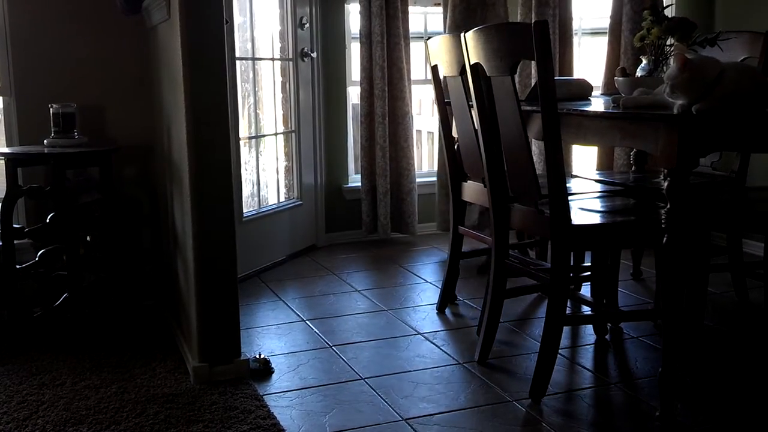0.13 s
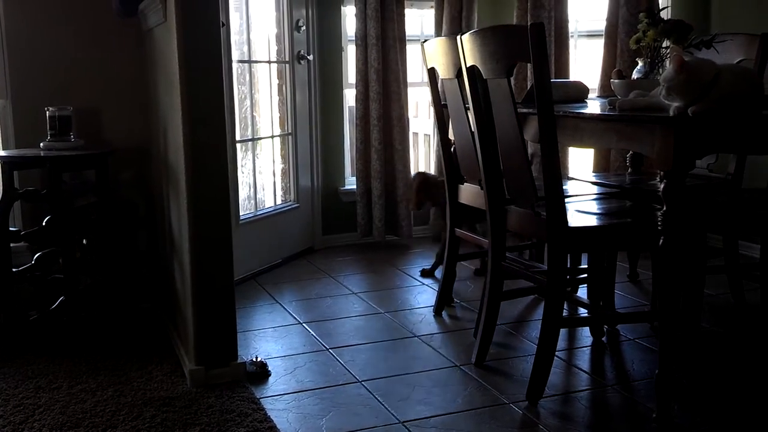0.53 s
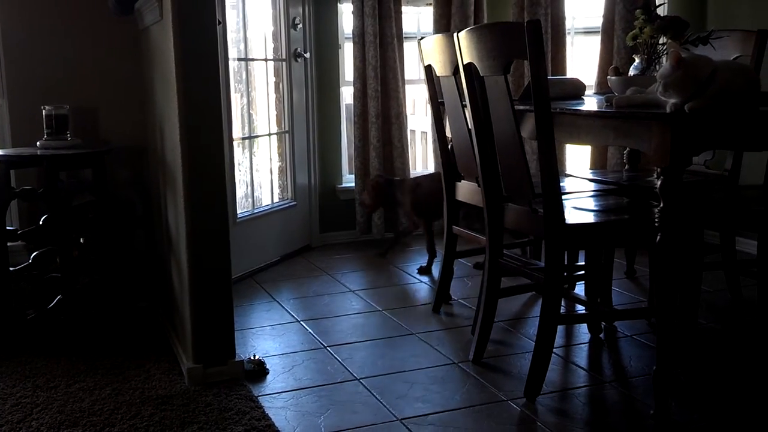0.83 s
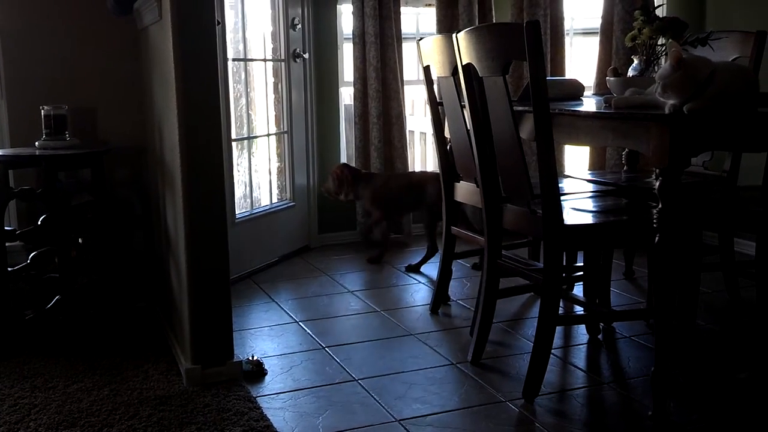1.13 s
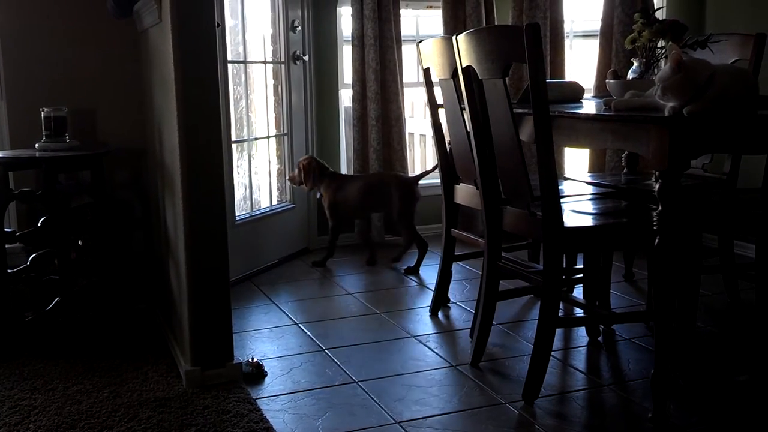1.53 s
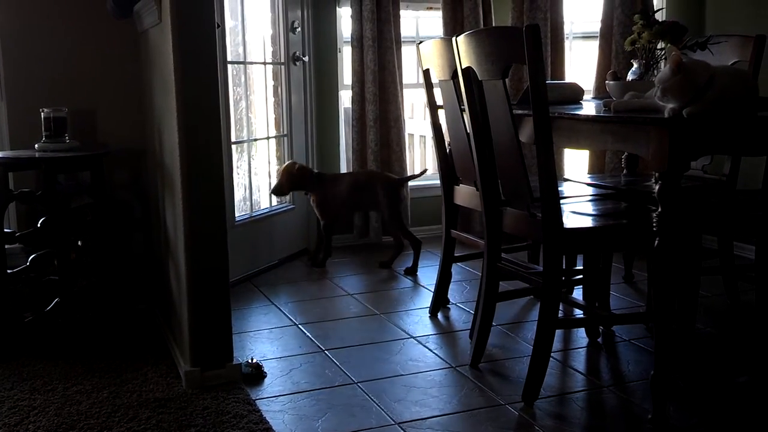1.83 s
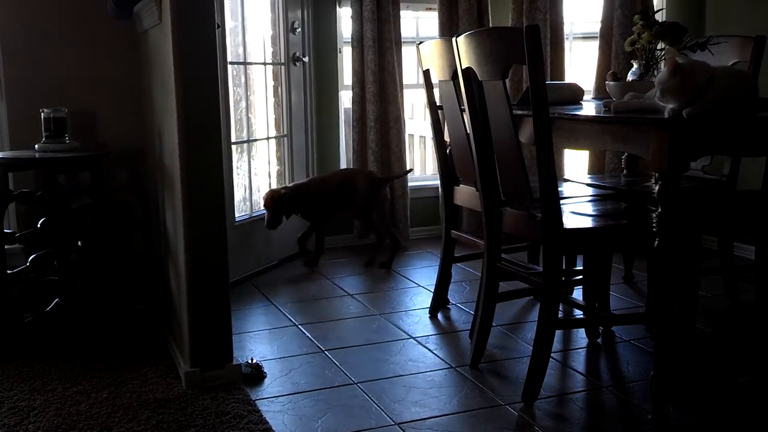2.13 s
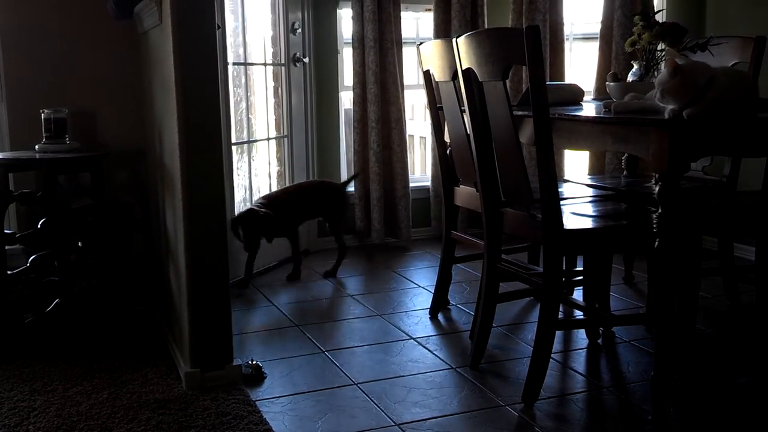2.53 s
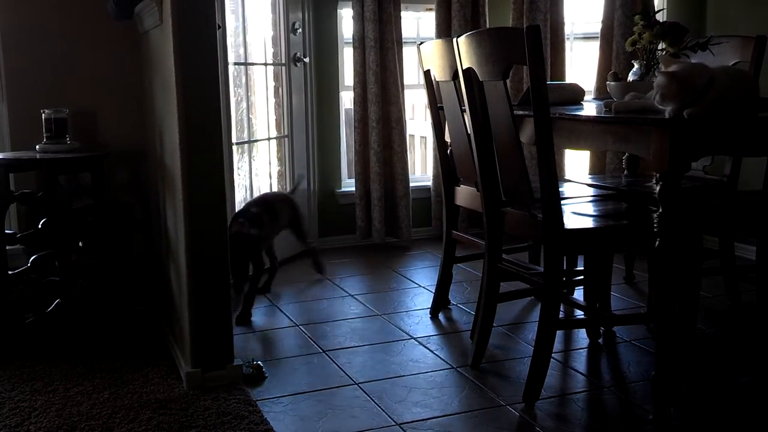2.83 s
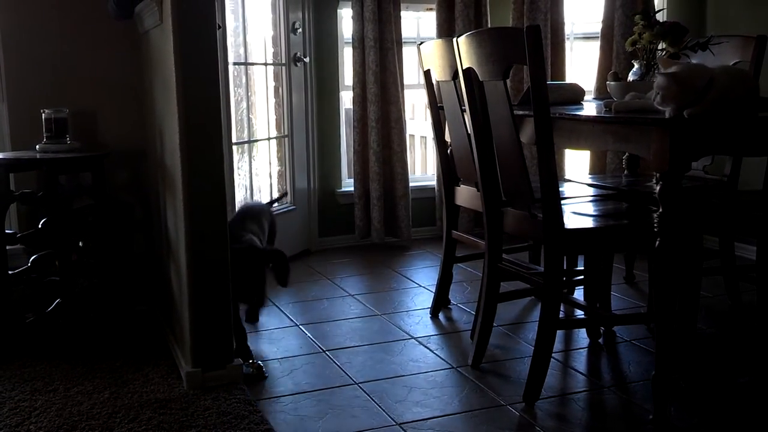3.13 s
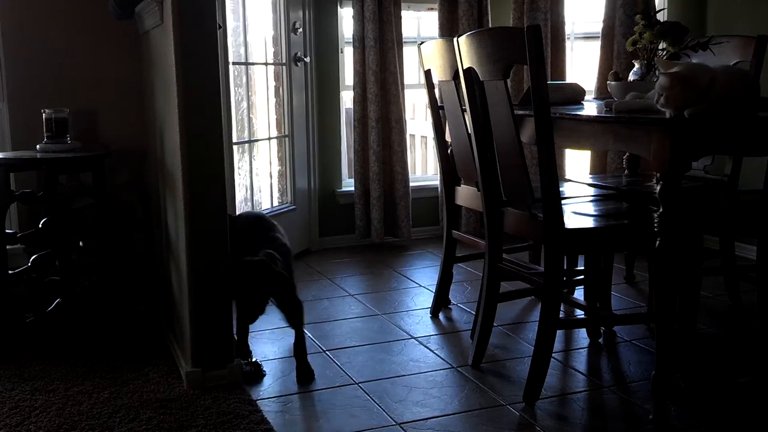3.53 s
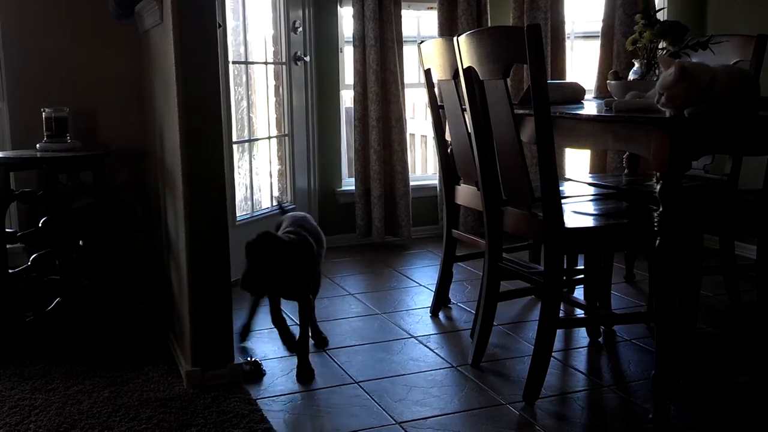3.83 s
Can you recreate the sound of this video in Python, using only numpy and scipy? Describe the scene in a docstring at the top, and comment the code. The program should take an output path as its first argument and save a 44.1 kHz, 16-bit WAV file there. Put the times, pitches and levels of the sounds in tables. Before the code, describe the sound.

Small bell rattles and rings in quick bright strikes after soft paw bumps on hard floor.

```python
"""Dog and small bell on a tiled floor

A dog walks over tiles and nudges a small hanging bell. Paws bump and scuff: noise bursts through
floor resonances, and soft bright swells. The bell is a bank of struck, ringing modes; a long scrape
is dense grains through flickering resonances. A motor whines faintly in high multiples of its tooth
rate, over a hum and room noise. The right channel carries most sources inverted and a little late.
"""
import sys
import numpy as np
from scipy import signal
from scipy.fft import rfft, irfft
from scipy.io import wavfile

SR = 44100
rng = np.random.default_rng(int(sys.argv[2]) if len(sys.argv) > 2 else 0)


def linear_from_db(decibels):
    """Turn decibels (scalar or array-like) into linear amplitude factors; 0 gives 1."""
    return 10 ** (np.asarray(decibels, float) / 20)


def unload_audio(sound):
    """Save the sound as a 16-bit wav file, at the path given as the first command line argument."""
    columns = np.transpose(np.atleast_2d(sound))
    # keep every value between -1 and 1, then stretch to whole-number steps
    steps = np.round(np.clip(columns, -1, 1) * 32767)
    wavfile.write(sys.argv[1], SR, steps.astype(np.int16))


N = 176400

# In noise spectra the level is relative and per Hz: the noise is then scaled to rms 1.
# Motor level: (time [s], level [dB])
MOTOR_LEVEL = [(0, -49), (.4, -52), (1.0, -53), (1.35, -55.5), (1.8, -54.5), (2.2, -51.5), (2.6, -52.5),
               (3.0, -54), (3.3, -60), (4, -61.5)]
# Motor speed: (time [s], tooth rate [Hz])
TOOTH_RATE = [(0, 203.8), (.5, 203.6), (1.25, 203.6), (1.75, 203.85), (2.25, 204.25), (2.75, 204.65),
              (3.1, 204.4), (4, 204.6)]
# Relative level of each successive multiple of the tooth rate: level [dB]
MULTIPLE_LEVELS = [-8.5, -15.5, -8.5, -21, -9, -11.5, -41, -1, -0.5, 0.5, -5.5, -8.5, -2, -4, -21, -4, -1.5,
                   -3.5, -3, -2.5, -8, -2.5, -12, -10, -16.5, -16.5]
FIRST_MULTIPLE = 20
# A slower shaft puts a side line on either side of each multiple.
SHAFT_HZ, SIDE_LINE_DB = 56.93, -12
WHINE_WANDER_DB, WHINE_WANDER_HZ = 2.2, 1.5
# Motor hiss spectrum: (frequency [Hz], level [dB])
HISS_SPECTRUM = [(3500, -14), (4500, -1), (5700, 1), (7800, 3.5), (8600, -16), (9400, -46)]
# Motor hiss level: (time [s], level [dB])
HISS_COURSE = [(0, -60.5), (1.2, -62), (1.4, -63.5), (1.9, -64), (2.2, -64.5), (3.0, -56.5), (3.6, -58),
               (4, -62.5)]
# Hum lines: (frequency [Hz], level [dB], lead of the left channel [rad])
HUM_LINES = [(119.7, -68.5, 1.3), (215.8, -60.5, 1.46), (324.2, -69.5, 1.31)]
# Room noise spectrum: (frequency [Hz], level [dB])
AIR_SPECTRUM = [(25, -36), (60, -10), (120, -1), (250, -1), (600, -11.5), (1000, -11), (2000, -17.5),
                (3500, -21), (9000, -28.5), (16000, -23)]
# Room noise level: (time [s], level [dB])
AIR_COURSE = [(0, -55), (.8, -52.5), (1.2, -55), (1.4, -56.5), (2, -59), (3, -55.5), (4, -54)]
# Spectrum of the low noise that differs between the channels: (frequency [Hz], level [dB])
WIDE_SPECTRUM = [(25, -30), (60, -14.5), (95, 1.5), (130, 0), (250, -0.5), (600, -7.5), (900, -12),
                 (1300, -46), (2000, -55)]
WIDE_NOISE_DB, WIDE_CORRELATION = -59, 0.37
# Soft scuffs: (time [s], level [dB], length [s])
SCUFF_EVENTS = [(.135, -59, 0.047), (.55, -57, 0.034), (0.689, -55.5, 0.048), (0.742, -57.5, 0.1),
                (1.098, -53.5, 0.066), (2.02, -63, 0.043), (2.289, -59, 0.048), (2.427, -68, 0.031),
                (3.83, -70, 0.026)]
# Scuff spectrum: (frequency [Hz], level [dB])
SCUFF_SPECTRUM = [(1500, -8), (3500, 15.5), (6000, 11), (10000, 7), (16000, 5.5)]
# Paw bumps: (time [s], peak level [dB], pitch [Hz], fall by 60 dB [s])
PAW_BUMPS = [(0.288, -43.5, 800, 0.25), (0.476, -42.5, 270, 0.044), (0.631, -45.5, 800, 0.11),
             (0.74, -29.5, 1010, 0.038), (0.758, -33.5, 1036, 0.053), (0.781, -40.5, 844, 0.26),
             (1.017, -46, 1250, 0.19), (1.049, -45, 1240, 0.27), (3.019, -52, 1180, .1)]
# Floor resonances: (multiple of the bump's pitch [ratio], level [dB])
FLOOR_MODES = [(.37, 1.5), (1.0001, 4.5), (.8, -8.5), (1.45, -7.5), (1.9, -14.5), (2.3, -12), (2.8, -15)]
# Bell modes in six groups that a strike excites unevenly: (frequency [Hz], level [dB], fall by 60 dB [s])
BELL_GROUPS = [
    [(4140, -12, 0.3), (4160, 0, 0.3)],
    [(4500, -7, .14), (4569, 0, 0.15), (4595, -5, .22), (4637, -8, 0.22)],
    [(9030, 0, 0.15), (9065, -3, 0.15), (9180, -8, 0.13), (9290, -12, .11)],
    [(11919, 0, .21), (11951, -1, .2)],
    [(12440, -12, .18), (12545, -3, 0.2), (12595, 0, 0.27), (12680, -8, .16)],
    [(14290, -9, .15), (14330, 0, .16), (14348, -1.5, .16), (14405, -12, .16)],
]
# Bell strikes: (time [s], level of each of the six groups [dB], crack level [dB])
BELL_STRIKES = [(2.651, -59, -42.5, -49, -60, -45, -46, -43),
                (2.657, -59, -44, -45.5, -60, -43.5, -49, -54), (2.837, -63, -49, -58, -51, -53, -64, -54),
                (2.849, -54.5, -55, -64, -61, -59, -68, -66),
                (3.0886, -54, -54, -39.5, -34, -36, -38, -29.5), (3.098, -43, -50, -47, -47, -39, -44, -56),
                (3.113, -50.5, -54, -39, -36, -37, -38, -54), (3.141, -44.5, -56, -59, -44, -44, -44, -62),
                (3.17, -60, -52, -58, -54, -52, -49, -66), (3.927, -52, -51.5, -40.5, -45, -40, -28, -33)]
# Stereo place of each bell group: left minus right [dB]
GROUP_PAN = [0, 0, -1.2, -.3, -.3, 3]
CONTACT_T60_S = 0.0054  # the touch is soft: each mode swells for about a millisecond
CRACK_T60_S, CRACK_HIGH_PASS_HZ = 0.014, 4000
RATTLES_PER_S, RATTLE_DB, RATTLE_T60_S = 120, -16, 0.33
# The long scrape: (time [s], level [dB])
SCRAPE_LEVEL = [(3.304, -79), (3.309, -45.5), (3.34, -42.5), (3.365, -43), (3.385, -31), (3.42, -34.5),
                (3.47, -40.5), (3.55, -50), (3.66, -60)]
# Spectrum of the bare scrape: (frequency [Hz], level [dB])
SCRAPE_SPECTRUM = [(300, -22), (700, -15), (1500, 13), (3000, 3), (5000, 2), (8000, 1), (11000, -1),
                   (16000, -20)]
# Scrape resonances: (frequency [Hz], width [Hz], level [dB])
SCRAPE_MODES = [(800, 32, -16.5), (1269, 100, -3.5), (1610, 250, -8.5), (4210, 170, -11), (4460, 150, -6),
                (6490, 100, -4.5), (9200, 450, -5.5), (12400, 200, -9.5), (13900, 180, -15),
                (15050, 140, -2)]
SCRAPE_GRAINS_PER_S, SCRAPE_FLICKER_DB = 4000, 2.5
# The scrape's treble dies first.
DULL_FROM_S, DULL_DB_PER_S, DULL_ABOVE_HZ = 3.43, 60, 5200
# A low thud: (time [s], peak level [dB], resonance [Hz], fall by 60 dB [s])
LOW_THUD = (3.86, -52.5, 91, 0.8)
# A dull noise swell, cut off by the end:
# (time [s], peak level [dB], upper band edge [Hz], fall by 60 dB, negative for a rise [s])
LAST_SWELL = (3.9465, -38.5, 1900, -0.2)
ROOM_T60_S, ROOM_DB, ROOM_GAP_S = 0.21, -6, 0.0033
OWN_TAIL_DB = -17.5  # further tail that each channel has alone, on top of ROOM_DB
RIGHT_LAG_SAMPLES = 16


def rms_one(x):
    """Scale to rms 1."""
    return x / np.sqrt(np.mean(x ** 2) + 1e-20)


def in_time(rows):
    """Columns of a breakpoint curve, one value a sample."""
    s, *columns = np.transpose(rows)
    return [np.interp(np.arange(N) / SR, s, column) for column in columns]


def coloured(x, spectrum):
    """Give a noise its spectrum, interpolated over log frequency; rms 1."""
    hz, db = np.transpose(spectrum)
    f = np.maximum(np.arange(N // 2 + 1) * SR / N, 1)
    gain = linear_from_db(np.interp(np.log(f), np.log(hz), db))
    return rms_one(irfft(rfft(x) * gain, N))


def drift(rate_hz):
    """Slow random wander of rms 1: noise through two equal low-pass poles."""
    # made at a hundredth of the sample rate, the settling thrown away
    r = np.exp(-200 * np.pi * rate_hz / SR)
    slow = signal.lfilter([1], [1, -2 * r, r * r], rng.standard_normal(N // 100 + 1002))[1000:]
    return np.interp(np.arange(N) / 100, np.arange(len(slow)), rms_one(slow))


def ring(clicks, hz, t60):
    """Two-pole resonator: a unit click sets a dying sine of height 1 ringing."""
    r, w = linear_from_db(-60 / (t60 * SR)), 2 * np.pi * hz / SR
    return signal.lfilter([0, np.sin(w)], [1, -2 * r * np.cos(w), r * r], clicks + 1e-18)


def dying(s, t60):
    """Envelope that starts at s and falls 60 dB in t60 (rises if t60 is negative)."""
    t = np.arange(N) / SR - s
    return (t >= 0) * linear_from_db(-60 * np.maximum(t, 0) / t60)


def motor():
    """High multiples of the tooth rate, each wandering in level, with side lines and hiss."""
    rate, = in_time(TOOTH_RATE)
    level_db, = in_time(MOTOR_LEVEL)
    hiss_db, = in_time(HISS_COURSE)
    turn = 2 * np.pi * np.cumsum(rate) / SR
    shaft = 2 * np.pi * SHAFT_HZ * np.arange(N) / SR
    whine = 0
    for k, multiple_db in enumerate(MULTIPLE_LEVELS):
        phase = rng.uniform(0, 2 * np.pi, 3)
        line = (FIRST_MULTIPLE + k) * turn
        side_gain = linear_from_db(SIDE_LINE_DB + WHINE_WANDER_DB * drift(WHINE_WANDER_HZ))
        sides = np.sin(line + shaft + phase[1]) + np.sin(line - shaft + phase[2])
        gain = linear_from_db(multiple_db + WHINE_WANDER_DB * drift(WHINE_WANDER_HZ))
        whine = whine + gain * (np.sin(line + phase[0]) + side_gain * sides)
    hiss = coloured(rng.standard_normal(N), HISS_SPECTRUM)
    return linear_from_db(level_db) * rms_one(whine) + linear_from_db(hiss_db) * hiss


def hum():
    """Low sines that waver in level and phase, the left channel leading; two channels."""
    t = np.arange(N) / SR
    out = 0
    for hz, db, lead in HUM_LINES:
        phase = 2 * np.pi * hz * t + 0.44 * drift(2.9) + np.array([[lead], [0]])
        out = out + linear_from_db(db + 1.26 * drift(7.8)) * np.sqrt(2) * np.sin(phase)
    return out


def room_noise():
    """Coloured noise whose level follows a curve and wanders slowly."""
    level_db, = in_time(AIR_COURSE)
    return linear_from_db(level_db + 3.1 * drift(0.98)) * coloured(rng.standard_normal(N), AIR_SPECTRUM)


def wide_noise():
    """Low noise, only partly alike in the two channels: a mid and a side noise are mixed."""
    mid = np.sqrt(1 + WIDE_CORRELATION) * coloured(rng.standard_normal(N), WIDE_SPECTRUM)
    side = np.sqrt(1 - WIDE_CORRELATION) * coloured(rng.standard_normal(N), WIDE_SPECTRUM)
    return linear_from_db(WIDE_NOISE_DB) * (mid + side * [[1], [-1]]) / np.sqrt(2)


def scuffs():
    """Short swells of bright noise that rise faster than they fall."""
    t = np.arange(N) / SR
    swell = 0
    for s, db, length in SCUFF_EVENTS:
        progress = np.clip((t - s) / length, 0, 1)
        swell = swell + linear_from_db(db) * np.sin(np.pi * progress ** 0.58)
    return swell * coloured(rng.standard_normal(N), SCUFF_SPECTRUM)


def bumps():
    """A paw's burst of noise dies away in the floor's resonances."""
    out, white = 0, rng.standard_normal(N)
    for s, db, hz, t60 in PAW_BUMPS:
        burst = white * dying(s, t60)
        bump = sum(linear_from_db(mode_db) * ring(burst, hz * ratio, 15.5 / hz) for ratio, mode_db in FLOOR_MODES)
        out = out + linear_from_db(db) * bump / np.abs(bump).max()
    return out


def bell():
    """Each strike rings the modes and cracks briefly; the loose clapper touches again, ever weaker."""
    out, strikes = 0, np.array(BELL_STRIKES)
    starts = (strikes[:, 0] * SR).astype(int)
    soft = 2 * (1 - linear_from_db(-60 / (CONTACT_T60_S * SR)))
    touch = rng.random(N) < RATTLES_PER_S / SR
    for k, group in enumerate(BELL_GROUPS):
        fading = sum(linear_from_db(row[k + 1]) * dying(row[0], RATTLE_T60_S) for row in BELL_STRIKES)
        rattle = linear_from_db(RATTLE_DB) * touch * fading
        pan = linear_from_db(GROUP_PAN[k] * np.array([[.5], [-.5]]))
        for hz, db, t60 in group:
            clicks = rattle * rng.standard_normal(N)
            clicks[starts] = linear_from_db(strikes[:, k + 1] + rng.normal(0, 1.0, len(strikes)))
            push = soft * ring(clicks, hz, CONTACT_T60_S)
            out = out + pan * linear_from_db(db) * ring(push, hz, t60)
    high_pass = signal.butter(1, CRACK_HIGH_PASS_HZ, "high", fs=SR, output="sos")
    crack = signal.sosfilt(high_pass, rng.standard_normal(N))
    return out + crack * sum(linear_from_db(row[-1]) * dying(row[0], CRACK_T60_S) for row in BELL_STRIKES)


def scrape():
    """Dense grains, partly bare, partly through flickering resonances; the treble dies first."""
    t = np.arange(N) / SR
    grains = rng.standard_normal(N) * (0.5 + (rng.random(N) < SCRAPE_GRAINS_PER_S / SR))
    out = coloured(grains, SCRAPE_SPECTRUM)
    for hz, width_hz, db in SCRAPE_MODES:
        t60 = np.log(1000) / (np.pi * width_hz)
        flicker = linear_from_db(db + SCRAPE_FLICKER_DB * drift(14.0))
        out = out + flicker * rms_one(ring(grains, hz, t60))
    low_pass = signal.butter(2, DULL_ABOVE_HZ, fs=SR, output="sos")
    treble = (out - signal.sosfiltfilt(low_pass, out)) / out.std()
    treble_gain = linear_from_db(-DULL_DB_PER_S * np.maximum(t - DULL_FROM_S, 0))
    out = rms_one(out) + (treble_gain - 1) * treble
    level_db, = in_time(SCRAPE_LEVEL)
    sounding = (t > SCRAPE_LEVEL[0][0]) * (t < SCRAPE_LEVEL[-1][0])
    return linear_from_db(level_db + 0.9 * drift(30.0)) * out * sounding


def thud():
    """Dying noise twice through one low resonance."""
    s, db, hz, t60 = LOW_THUD
    burst = rng.standard_normal(N) * dying(s, t60)
    low = ring(ring(burst, hz, 6.7 / hz), hz, 6.7 / hz)
    return linear_from_db(db) * low / np.abs(low).max()


def last_swell():
    """A dull noise swell, cut off by the end: band-passed noise under a rising envelope."""
    s, db, hz, t60 = LAST_SWELL
    band = signal.butter(2, [hz / 5, hz], "band", fs=SR, output="sos")
    swell = signal.sosfilt(band, rng.standard_normal(N) * dying(s, t60))
    return linear_from_db(db) * swell / np.abs(swell).max()


def room(x):
    """Reverberation: convolution with a dying noise tail after a short gap."""
    t = np.arange(SR) / SR
    tail = rng.standard_normal(SR) * linear_from_db(-60 * t / ROOM_T60_S) * (t > ROOM_GAP_S)
    return linear_from_db(ROOM_DB) * signal.fftconvolve(x, tail / np.sqrt(np.sum(tail ** 2)))[:N]


def scene():
    """Mix all sources; most reach the right channel inverted and late."""
    close = scuffs() + bumps() + bell() + last_swell()
    middle, rub = close.mean(axis=0), scrape()
    left, right = close + room(middle) + rub + motor() + room_noise()
    own_tails = linear_from_db(OWN_TAIL_DB) * np.array([room(middle + rub), room(middle + rub)])
    main = np.array([left, -np.roll(right, RIGHT_LAG_SAMPLES)])
    return main + own_tails + wide_noise() + hum() + thud()


def band_limit(x):
    """A steep low-pass at the top of the band."""
    return signal.sosfilt(signal.butter(12, 16530, fs=SR, output="sos"), x)


def record(dry):
    """A steep low-pass cuts the top: 60 dB down from 15900 Hz up."""
    low_pass = signal.cheby2(12, 60, 15900, fs=SR, output="sos")
    mix = signal.sosfilt(low_pass, dry)
    return band_limit(mix)


dry = scene()
out = record(dry)
unload_audio(out)
```